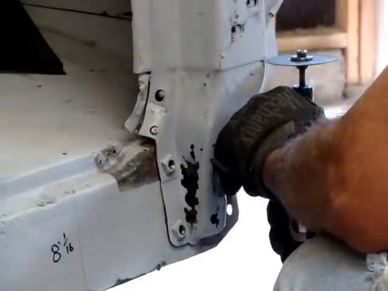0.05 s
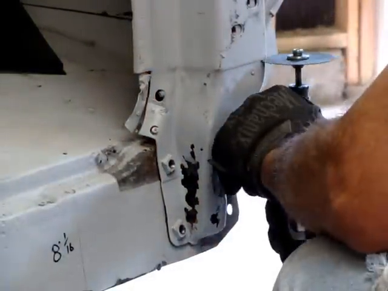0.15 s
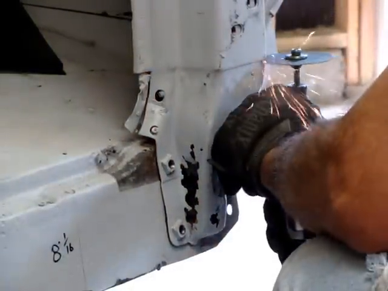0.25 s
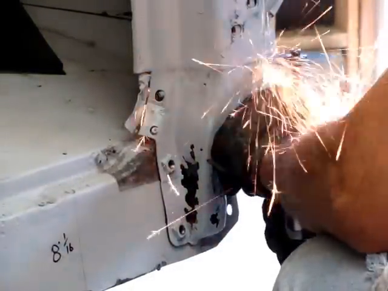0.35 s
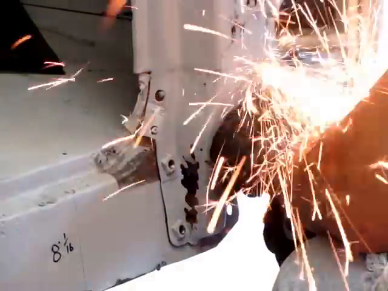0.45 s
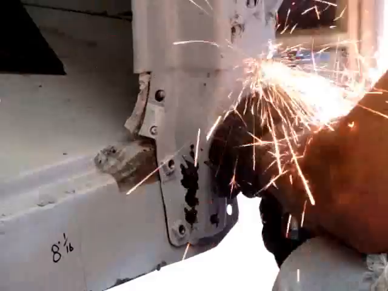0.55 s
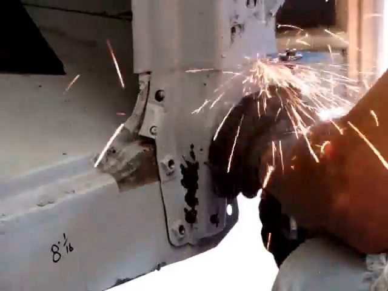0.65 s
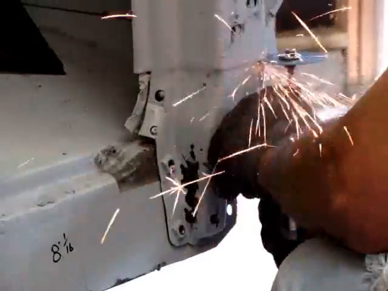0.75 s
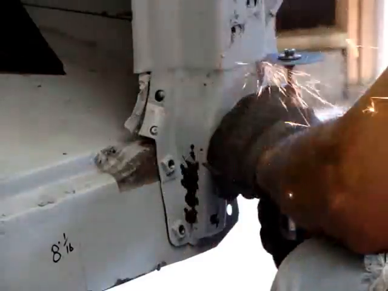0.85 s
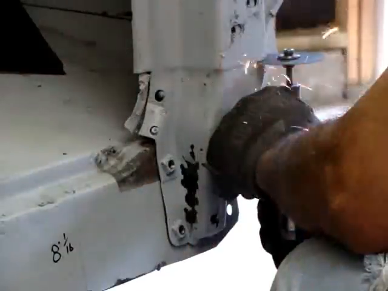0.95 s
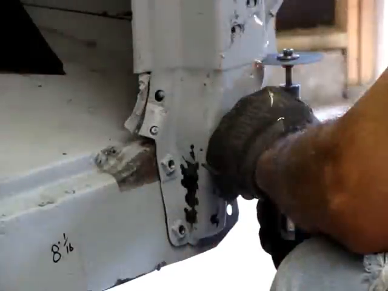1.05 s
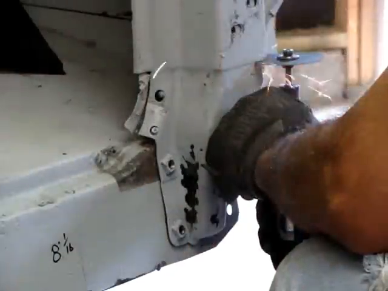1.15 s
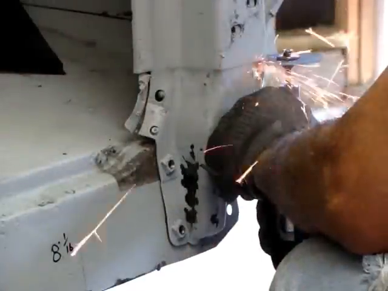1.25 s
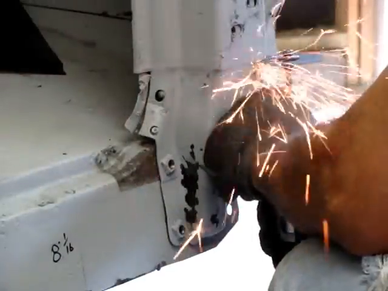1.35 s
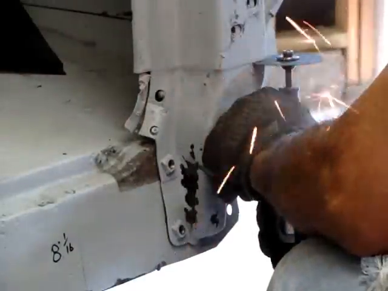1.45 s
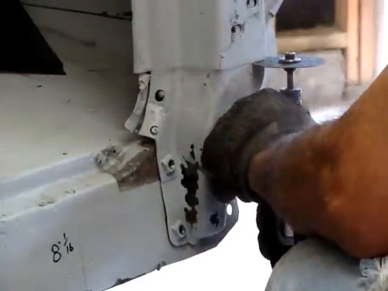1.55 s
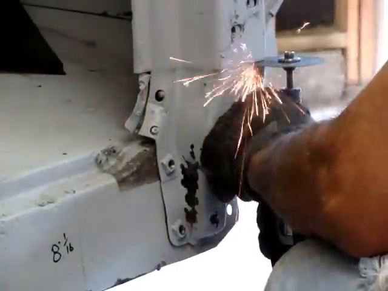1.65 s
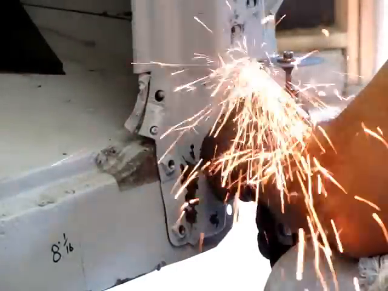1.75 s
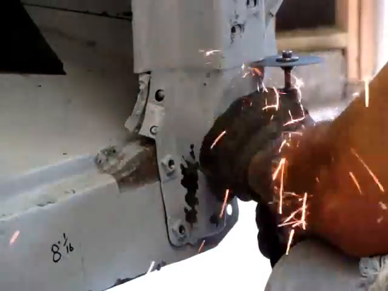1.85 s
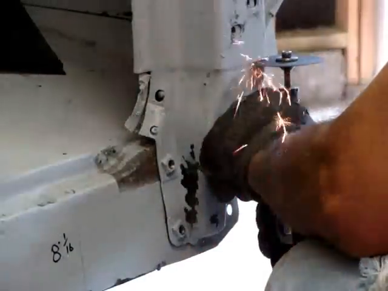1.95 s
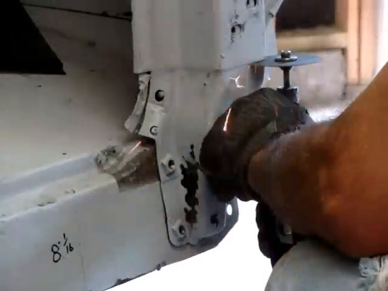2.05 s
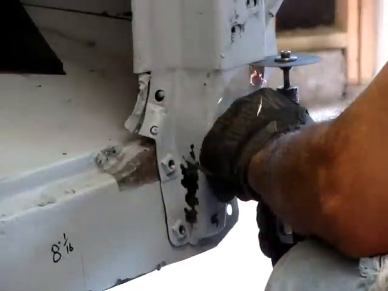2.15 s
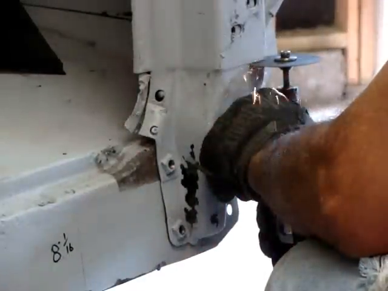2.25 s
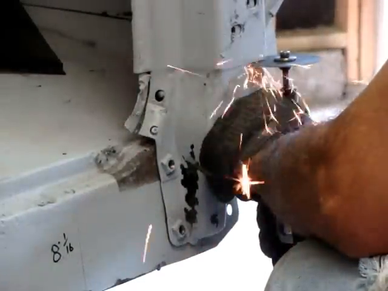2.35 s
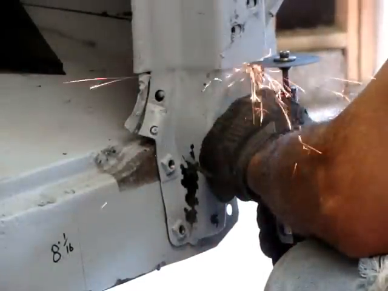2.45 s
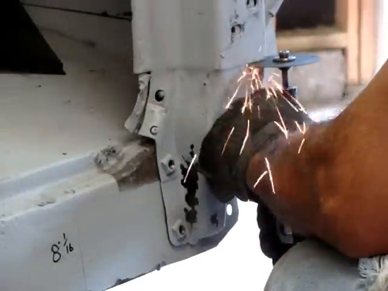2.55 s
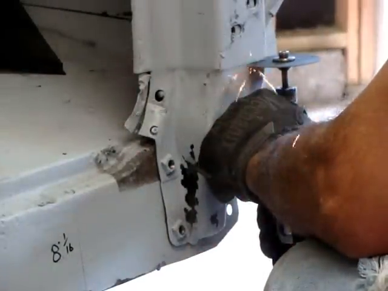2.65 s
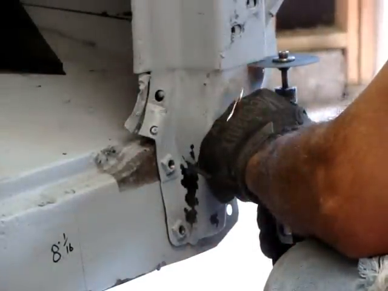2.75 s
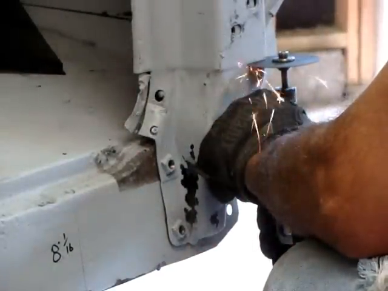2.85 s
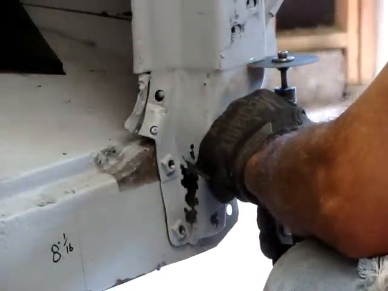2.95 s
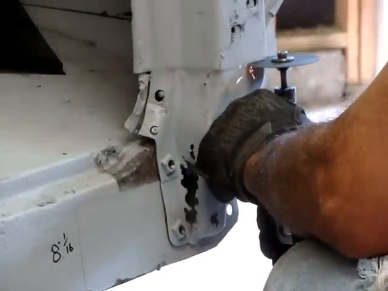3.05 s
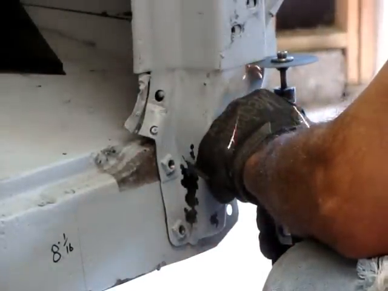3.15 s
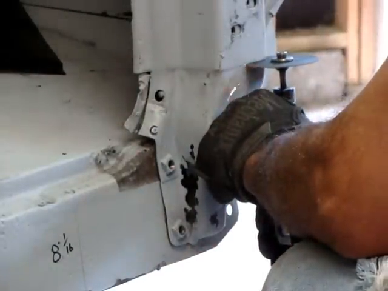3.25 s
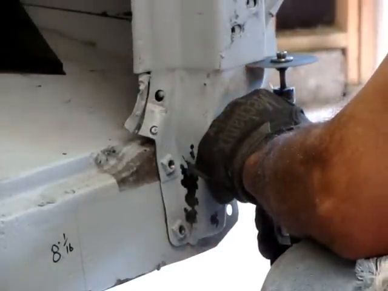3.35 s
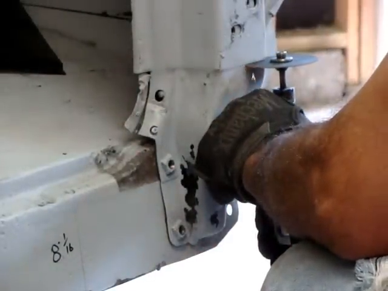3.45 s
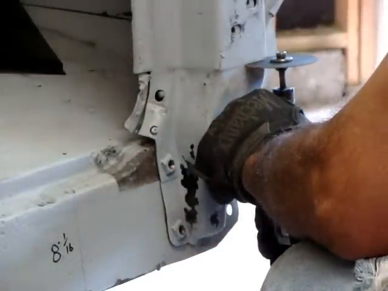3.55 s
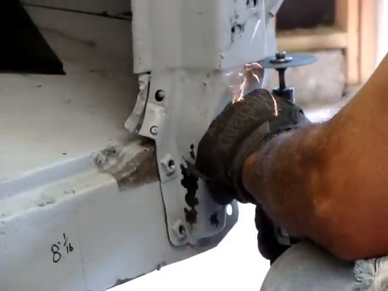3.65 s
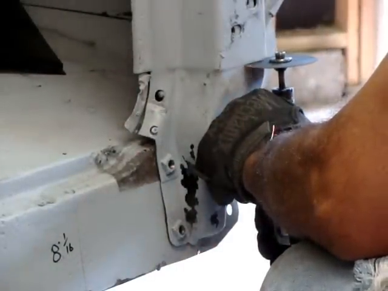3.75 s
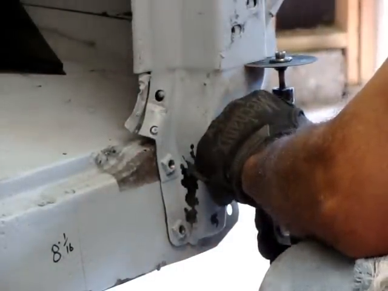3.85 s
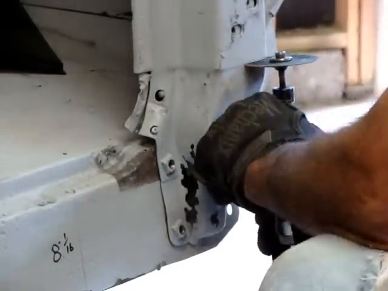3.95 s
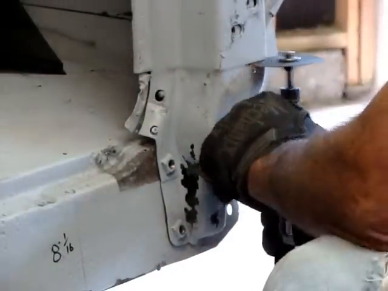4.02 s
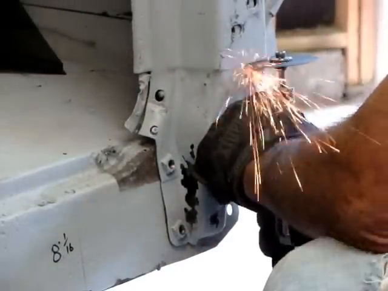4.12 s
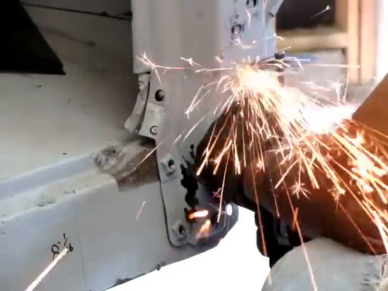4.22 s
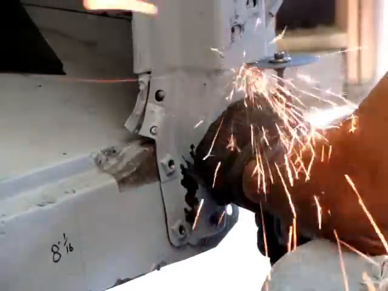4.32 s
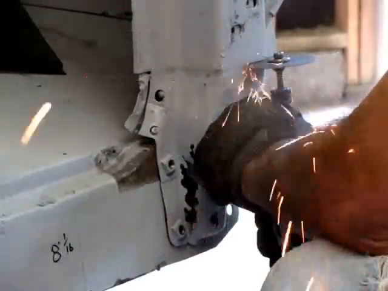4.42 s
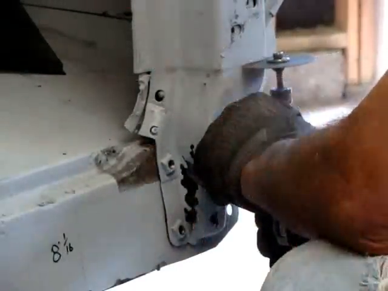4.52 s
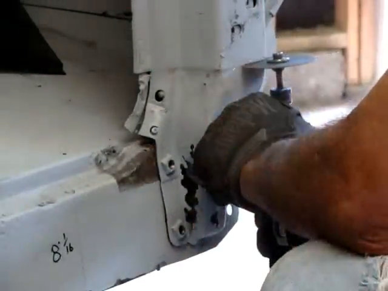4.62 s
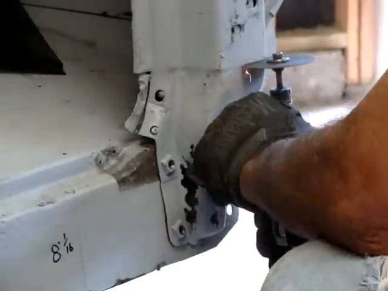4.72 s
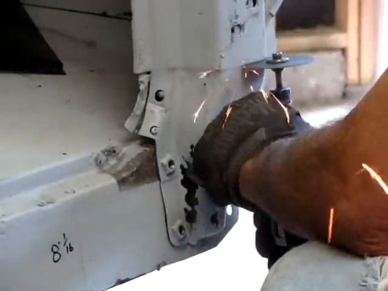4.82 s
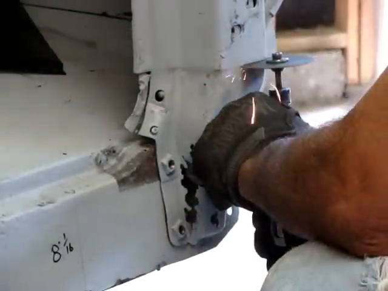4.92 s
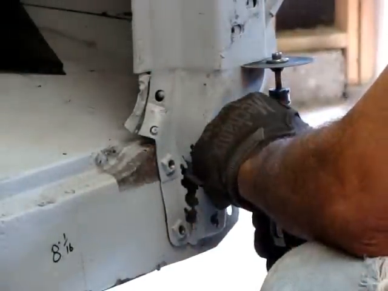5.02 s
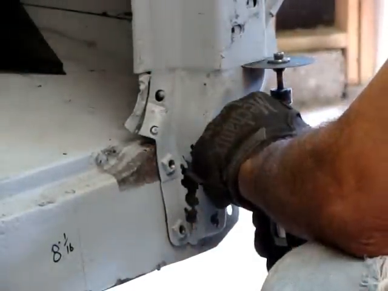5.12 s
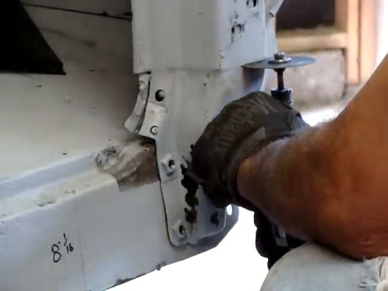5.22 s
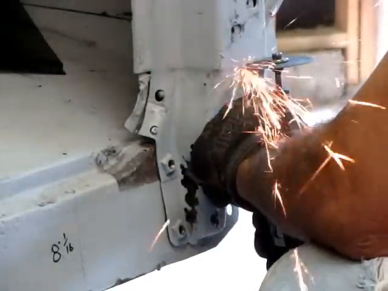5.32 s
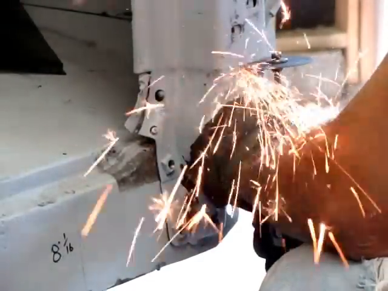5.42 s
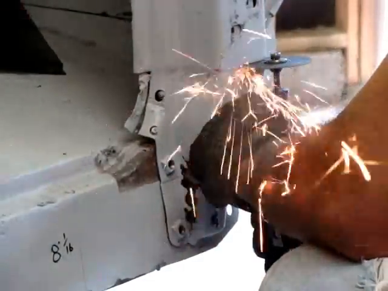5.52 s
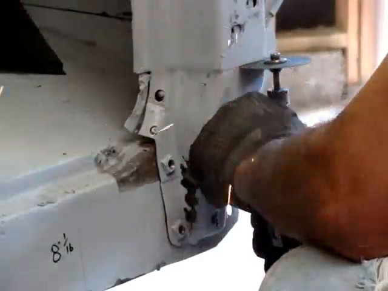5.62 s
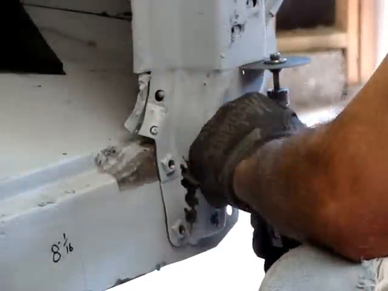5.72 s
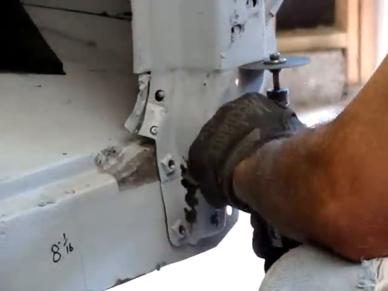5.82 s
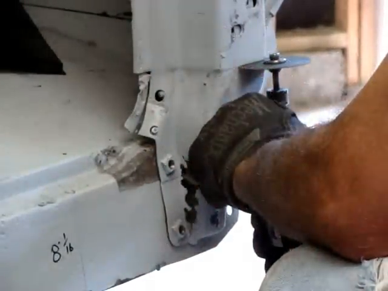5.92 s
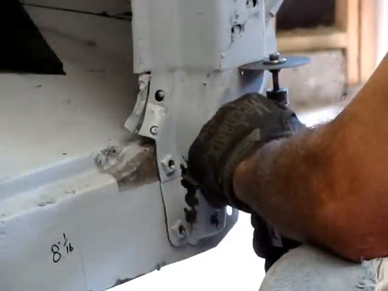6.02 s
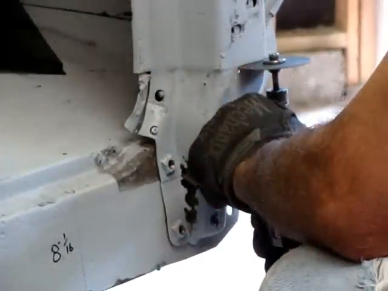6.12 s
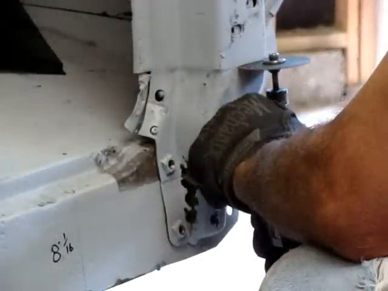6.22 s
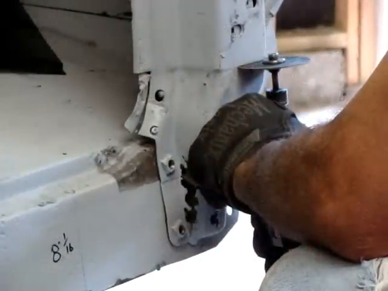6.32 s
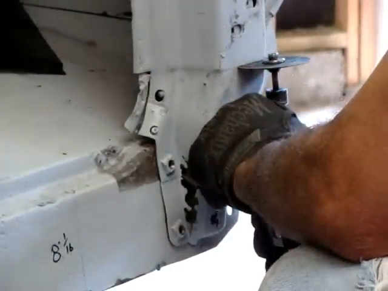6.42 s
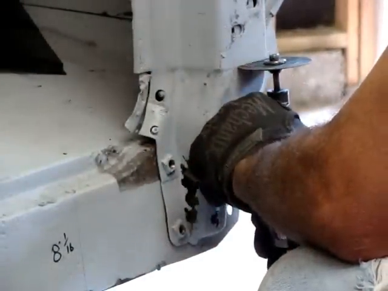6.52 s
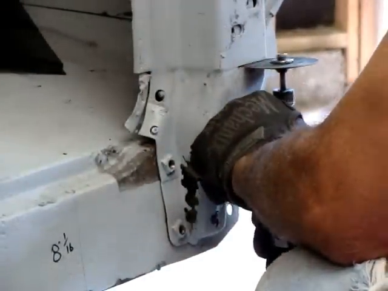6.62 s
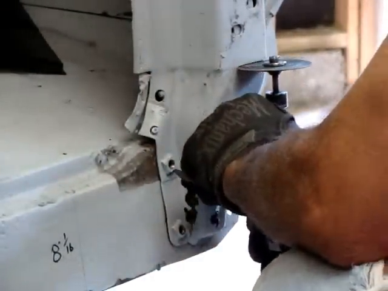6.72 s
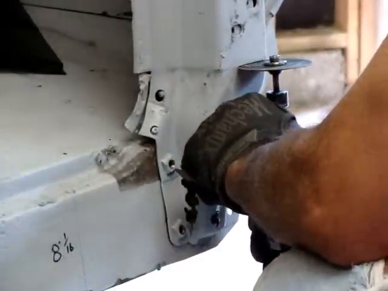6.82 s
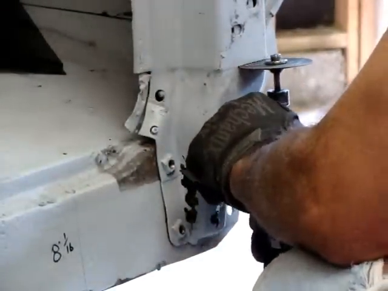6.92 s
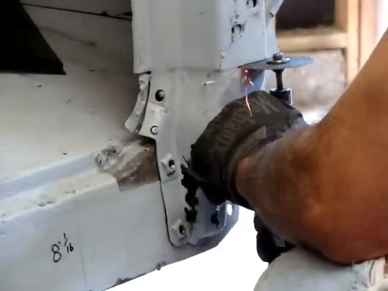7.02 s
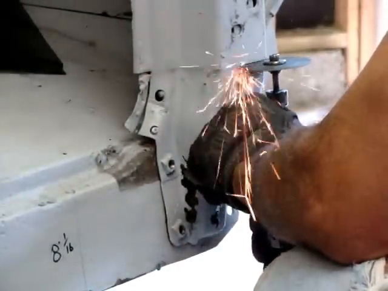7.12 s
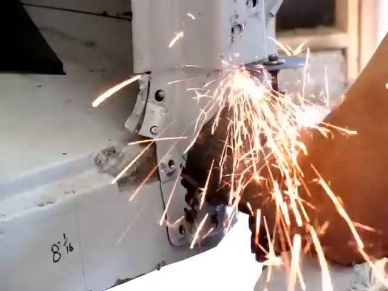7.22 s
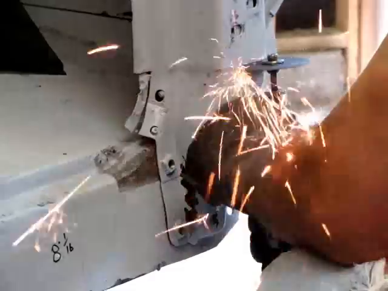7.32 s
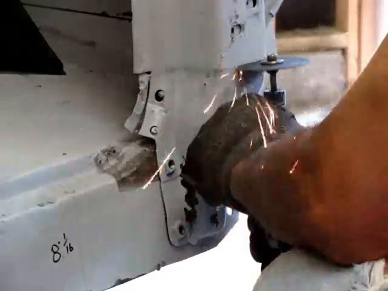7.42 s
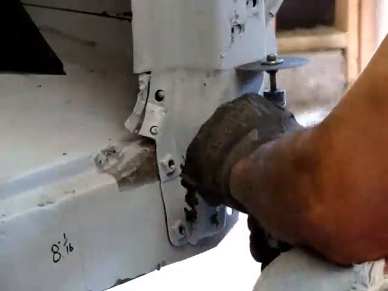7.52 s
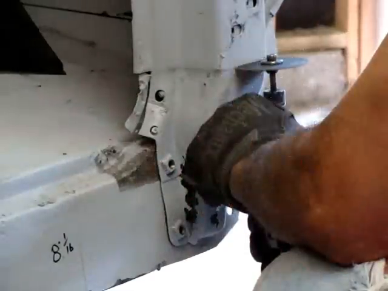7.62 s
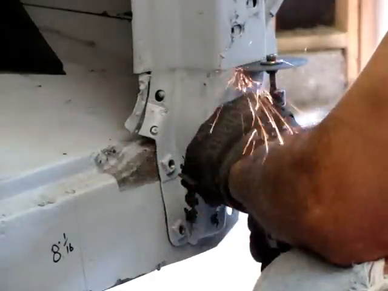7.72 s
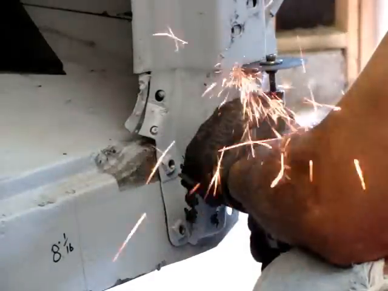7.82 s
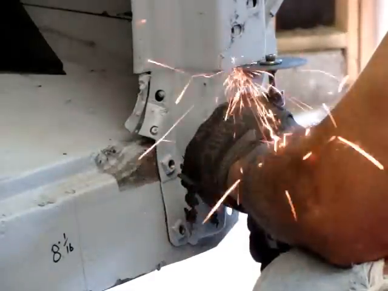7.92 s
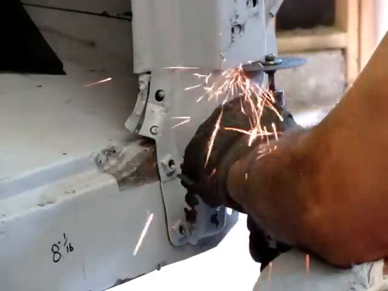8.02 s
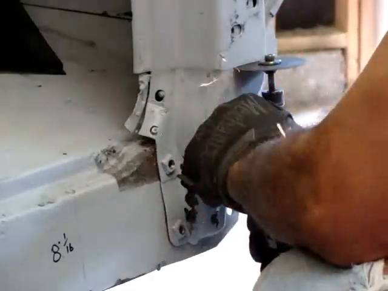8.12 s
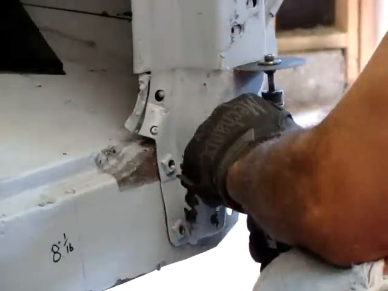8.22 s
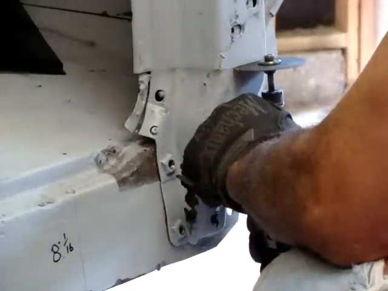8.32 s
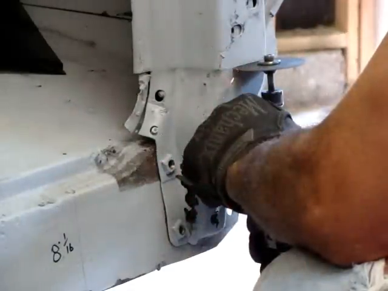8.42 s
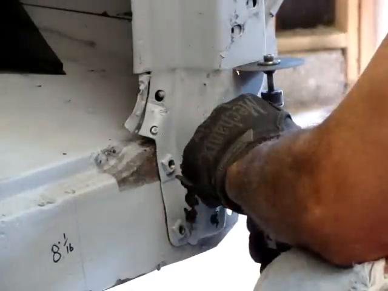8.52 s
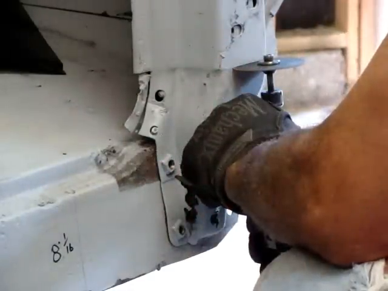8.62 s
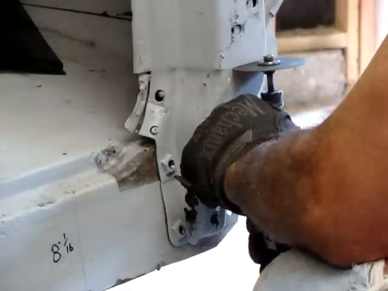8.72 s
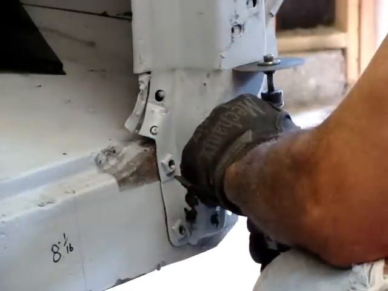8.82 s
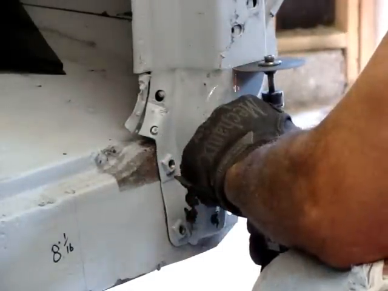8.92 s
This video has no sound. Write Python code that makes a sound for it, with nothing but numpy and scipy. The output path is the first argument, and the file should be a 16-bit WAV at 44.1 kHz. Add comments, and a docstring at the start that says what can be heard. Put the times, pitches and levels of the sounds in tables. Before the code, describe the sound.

Knocks, then a small pneumatic cutting wheel races and bogs down against sheet steel, harsh hiss and gritty scraping broken by brief stops.

```python
"""An air die grinder's vane motor whines as its small cut-off wheel works into a steel car panel in a garage.
Puffs of the vanes and the rub of an uneven rim make tones that rise as the wheel races and sink as it bites.
Chopped noise makes the exhaust hiss; grit noise and resonances make the rasp, the sparks and the knocks.
Spent air buffets the microphone. A compressor of sine lines and stroke noise drones, loudest in a long stall."""
import sys
import numpy as np
from scipy import signal
from scipy.fft import rfft, irfft, next_fast_len
from scipy.io import wavfile

SR = 44100
rng = np.random.default_rng(int(sys.argv[2]) if len(sys.argv) > 2 else 0)


def file_out(sig):
    """Save sig as 16-bit WAV at sys.argv[1]."""
    # one column per channel
    cols = np.atleast_2d(sig).T
    # limit, then scale
    lim = np.clip(cols, -1, 1)
    pcm = np.round(lim * 32767).astype(np.int16)
    wavfile.write(sys.argv[1], SR, pcm)


N = 395136
TIME = np.arange(N) / SR

# Pulls of the trigger; a light pull lets air through but does not turn the wheel:
# (open t/s, close t/s, relative air level/dB, relative cutting level/dB,
#  attack time constant/s, release time constant/s, pull: above 0.5 is full, below is light)
TRIGGER_PULLS = [(0.194, 0.306, -24, -26.5, 0.02, .02, 0), (0.31, 1.555, -18, -22.5, 0.025, 0.026, 1),
                 (1.699, 3.89, -18, -17, 0.018, 0.046, 1), (4.1, 5.07, -17, -18, 0.0076, 0.037, 1),
                 (5.13, 5.291, -33.5, -36.5, 0.056, 0.09, 0.01),
                 (5.225, 5.255, -23.5, -30, 0.0036, .012, 0), (5.335, 6.415, -17, -17, 0.011, 0.07, 1),
                 (6.48, 7.117, -20, -19.5, 0.54, 0.016, 0), (7.088, 9, -17.5, -18, 0.013, 0.046, 1)]
# The hand eases off and the wheel races, then bogs down again:
# (t of the top/s, added speed/turns per s, rise/s, fall/s, change of whine level/dB)
SPEED_SURGES = [(.408, 486, .254, .267, 1), (.825, 26, .05, .035, 1.5), (.931, 76, .184, .179, 2.5),
                (1.491, 192, .223, .134, .5), (1.82, 217, .096, .122, 1), (2.095, 73, .081, .062, 2),
                (2.306, 37, .066, .068, 0), (2.529, 99, .142, .221, 4), (2.983, 54, .089, .07, 2),
                (3.245, 56, .088, .075, 0), (3.5, 9, .25, .25, -1.5), (3.755, 48, .055, .085, -2),
                (4.221, 420, .195, .16, -1), (4.457, 81, .062, .124, 1), (4.703, 25, .041, .041, -2),
                (4.881, 61, .051, .208, 0), (5.374, 331, .105, .2, 0), (5.627, 48, .062, .08, 0),
                (5.883, 35, .05, .056, -1.5), (6.239, 21, .123, .086, -1.5), (7.161, 338, .212, .243, -1),
                (7.91, 161, .13, .26, .5), (8.49, 24, .16, .05, -3), (8.83, 25, .04, .06, 0)]
IDLE_SPEED, LOADED_SPEED = 25.0, 82.0  # turns per s: creeping, and deep in the cut
SPIN_UP_S, COAST_S = .04, .07  # time constants


def rotor_speed():
    """First-order spin-up: air drives the rotor toward its loaded speed, surges add to it (turns per s)."""
    driven = sum(gate(start, stop, SPIN_UP_S, COAST_S)
                 for start, stop, *_, pull in TRIGGER_PULLS if pull > .5)
    racing = sum(added * swell(s, rise, fall) for s, added, rise, fall, _ in SPEED_SURGES)
    return IDLE_SPEED + driven * (LOADED_SPEED - IDLE_SPEED + racing)


def howl():
    """Level envelope: each surge of speed has its own whine level, some howl louder than others (dB)."""
    return sum(db * swell(s, rise, fall) for s, _, rise, fall, db in SPEED_SURGES)


# The wheel digs in harder, above all as it jerks into motion:
# (t/s, added cutting level/dB, half length/s)
WHEEL_BITES = [(0.35, 13, 0.035), (0.523, 14, 0.18), (1.373, 8, 0.15), (1.78, 4, 0.022), (3.18, 0, 0.03),
               (4.15, 9.5, 0.023), (4.437, 2, 0.027), (4.885, 1.5, 0.074), (5.385, 12, 0.024),
               (7.15, 9.5, 0.034), (7.748, 2, 0.19)]
SPURT_DB, SPURT_S = 2.5, .02  # pent-up air escapes as the valve opens
RUB_ON_S = 0.03  # the wheel rubs on after the air is shut off


def effort():
    """Valve flow as the common drive: exhaust and cutting levels (dB) follow it, bites add to the cutting."""
    air = cut = 1e-5
    for start, stop, air_db, cut_db, attack, release, _ in TRIGGER_PULLS:
        spurt_db = SPURT_DB * np.exp(-since(start) / SPURT_S)
        air = air + from_db(air_db + spurt_db) * gate(start, stop, attack, release)
        cut = cut + from_db(cut_db) * gate(start, stop + RUB_ON_S, attack, release)
    bites_db = sum(db * swell(s, length, length) for s, db, length in WHEEL_BITES)
    return 20 * np.log10(air), 20 * np.log10(cut) + bites_db


VANES = 4
# Harmonics of the vane rate: (multiple, relative level/dB)
VANE_HARMONICS = [(1, 0), (2, 0), (3, 3), (4, 1), (5, -1), (6, -1), (7, -1), (8, -2), (9, -3), (10, -3),
                  (11, -4), (12, -4)]
# Response of the exhaust port to one vane line: (f/Hz, gain/dB)
PORT_RESPONSE = [(300, -56), (800, -45), (930, -34), (1085, -24), (1200, -33), (1450, -28.5), (1780, -26.5),
                 (2350, -30), (2850, -26), (3400, -35), (4300, -44), (5700, -38), (8000, -46), (15000, -52)]
# Response to one line of the uneven rim: (f/Hz, gain/dB)
RIM_RESPONSE = [(200, -62), (550, -49), (1000, -42), (2000, -41), (3800, -43), (5200, -36), (6800, -38),
                (10000, -43), (15000, -47)]


def whine(speed, level_db, stall_speed=86.0, motor_db=17.7, wheel_db=15.0, waver_db=2.4, panel_db=0.0,
          rim_lines=50):
    """Periodic excitation: a puff per vane and a rim rub per turn, both growing with speed."""
    turns = np.cumsum(speed + .5 * drift(45)) / SR
    octaves = np.log2(speed / 190)
    spinning = 1 / (1 + (stall_speed / speed) ** 4)
    vane_wave = cyclic(VANES * turns, [db for _, db in VANE_HARMONICS])
    puffs = colour(vane_wave, PORT_RESPONSE)
    rub = colour(cyclic(turns, rng.normal(0, 3.5, rim_lines)), RIM_RESPONSE)
    motor = puffs * from_db(motor_db + 1.2 * octaves + waver_db * drift(26))
    wheel = rub * from_db(wheel_db + 1.5 * octaves + drift(30))
    # at high speed puffs and rim make the thin wheel sing around its own resonances
    singing = resonate(motor, 5900, 1600) * np.clip((speed - 320) / 50, 0, 2.6)
    singing = singing + resonate(wheel, 5400, 500) * np.clip((speed - 460) / 25, 0, 3.4)
    # bogged down in the cut, the tool shakes the panel's lowest resonance
    bogged = 1 / (1 + (speed / 140) ** 4)
    humming = resonate(motor, 1085, 70) * from_db(panel_db + 3 * drift(10)) * bogged
    tones = (motor + wheel + singing + humming) * spinning * from_db(level_db)
    return garage(tones, near_db=-7, near_t60=.04, far_db=-7, far_t60=.26)


# Colour of the exhaust noise: (f/Hz, relative level per Hz/dB)
HISS_COLOUR = [(300, -22.5), (1000, -23), (2500, -10.5), (4200, -7.5), (5200, -6), (6300, -0.5),
               (7500, -3.5), (8800, -4.5), (10400, -3), (11500, -6), (15500, -10)]


def exhaust(speed, hiss_db, free_db=-3.5, chop=0.3, flutter_db=0.64, swirl=0.3, swirl_bands=9):
    """Amplitude modulation: vanes chop the swirling jet; reflections off steel add a metallic ripple."""
    chopping = 1 + chop * np.cos(2 * np.pi * VANES * np.cumsum(speed) / SR)
    jet = garage(noise(HISS_COLOUR), near_db=-11, near_t60=.03, far_db=-9, far_t60=.12)
    bands = np.geomspace(3500, 12000, swirl_bands)
    jet = jet + swirl * sum(resonate(jet, hz, hz / 10) * drift(9) for hz in bands)
    return jet * chopping * from_db(hiss_db + free_db * (speed / 450) ** 2 + flutter_db * drift(70))


# Colour of grit on steel: (f/Hz, relative level per Hz/dB)
RASP_COLOUR = [(150, -26.5), (350, -10.5), (600, -11.5), (850, 0), (1080, -4.5), (1250, -1), (1650, -0.5),
               (2600, 0), (3500, -2.5), (5000, -2), (9000, -7)]
# Panel resonances: (f/Hz, width/Hz, relative level/dB)
PANEL_MODES = [(1080, 7, 8.5), (1370, 31, -25), (1619, 18, 7), (1720, 17, 6), (1881, 20, 9.5),
               (2038, 30, 6.5), (2247, 23, 8.5), (2570, 22, 2.5), (2630, 19, 1), (3220, 38, 5),
               (3587, 40, 4), (3934, 18, 9.5), (4980, 57, 6), (5250, 66, 7), (5690, 69, 7.5),
               (6650, 62, -14), (6770, 19, 6.5)]


def rasp(speed, cut_db, grit_db=0.0, ring_db=-2.0, free_db=-9.0, grain_db=1.5):
    """Random excitation of modes: grit tears at the sheet and rings it, less so as the wheel runs free."""
    grit = noise(RASP_COLOUR) * from_db(grain_db * drift(230))
    scrape = rng.standard_normal(N)
    ring = rms_one(sum(from_db(db) * resonate(scrape, hz, width) for hz, width, db in PANEL_MODES))
    freedom = np.log2(1 + (speed / 260) ** 2)
    contact = from_db(grit_db) * grit + from_db(ring_db) * ring
    return from_db(cut_db + free_db * freedom) * contact


def sparks(hiss_db, per_s=400.0, spark_db=-12.0, spread_db=4.0):
    """Impulse response: flying grit ticks against the steel, each grain in one of ten resonances."""
    struck = rng.random(N) < per_s / SR
    sizes = from_db(spread_db * np.minimum(rng.exponential(1, N), 4)) * struck
    pitches = np.geomspace(4500, 13000, 10)
    dealt = rng.integers(0, len(pitches), N)
    ticks = sum(resonate(sizes * (dealt == k) + 1e-18, hz, 500) for k, hz in enumerate(pitches))
    return rms_one(ticks) * from_db(hiss_db + spark_db)


# Knocks: the wheel touches the panel, or the air valve snaps open:
# (t/s, relative level/dB, low-pass corner f/Hz)
KNOCK_EVENTS = [(.008, -23.5, 6000), (.113, -22.5, 1500), (0.129, -29.5, 8800), (.222, -33, 9000),
                (1.703, -42, 7000), (5.232, -31, 12000)]
# Ring after a knock: (f/Hz, relative level/dB, t60/s)
KNOCK_RING = [(518, -7, 0.49), (810, -4.5, 0.31), (835, -7.5, 0.91), (1550, -4.5, 0.45), (2660, 0, 0.27),
              (2860, -19, .25), (4780, -4.5, 0.24), (5470, -9, 0.2), (7200, -4, 0.16)]


def knocks(clatter_t60=0.23, clatter_db=0.0, ring_db=-3.0, ring_width_hz=145.0):
    """Modal decay: a touch of the wheel or a snap of the valve clatters and rings roughly, dying away."""
    out, t = np.zeros(N), TIME[:SR // 2]
    clatter = noise(RASP_COLOUR)
    for s, db, corner_hz in KNOCK_EVENTS:
        start = round(s * SR)
        span = slice(start, start + len(t))
        chatter = rng.standard_normal(len(t))
        ring = sum(from_db(level - 60 * t / t60) * rms_one(resonate(chatter, hz, ring_width_hz))
                   for hz, level, t60 in KNOCK_RING)
        hit = from_db(ring_db) * ring + clatter[span] * from_db(clatter_db - 60 * t / clatter_t60)
        dull = np.exp(-2 * np.pi * corner_hz / SR)
        out[span] += from_db(db) * signal.lfilter([1 - dull], [1, -dull], hit)
    return out


# Exhaust gusts on the microphone: (t/s, level/dB, half length/s)
AIR_GUSTS = [(0.226, -33, 0.007), (0.323, -30, 0.014), (7.098, -37, 0.022)]
# Colour of moving air: (f/Hz, relative level per Hz/dB)
BUFFET_COLOUR = [(15, 3.5), (35, -3), (70, -3.5), (150, -4), (300, -8), (600, -3.5), (1500, -24.5)]


def buffet(hiss_db, draught_db=-22.0):
    """Turbulent pressure: spent air blows over the microphone, with brief gusts."""
    gusts = sum(from_db(db) * np.exp(-((TIME - s) / length) ** 2) for s, db, length in AIR_GUSTS)
    draught = from_db(hiss_db + draught_db + 1.7 * drift(11))
    return noise(BUFFET_COLOUR) * (draught + gusts)


# Compressor drone over time: (t/s, level change/dB)
DRONE_LEVEL = [(0, -23), (1.7, -23.5), (4.05, -15.5), (5.2, -19.5), (6.5, -11.5), (6.62, -8), (6.78, -1),
               (7.07, 3.5), (7.19, -41), (8.96, -9)]
# Compressor lines: (f/Hz, relative rms level/dB)
COMPRESSOR_LINES = [(393.0, -42), (441.4, -40), (635.2, -36.5), (683.7, -34), (732.1, -39), (882.9, -38),
                    (1055, -33.5), (1077, -28.5), (1125, -47), (1174, -59), (1249, -41), (1292, -42),
                    (1421, -54), (1470, -54), (4610, -34.5)]
# Colour of chuff and rattle: (f/Hz, relative level/dB)
CHUFF_COLOUR = [(100, -37), (280, -18.5), (400, -3.5), (560, -9.5), (700, -6.5), (1050, 1), (1500, -8),
                (2500, -12), (6000, -12.5)]
STROKE_HZ, THROB_DB = 49.0, 2.2


def compressor(chuff_db=-23.5, rattle_db=-27.0, waver_db=-0.5, rattle_lines=100):
    """Line spectrum and modulated noise: pump and tank tones, with a rattle and chuff of air per stroke."""
    lines = 0
    for hz, db in COMPRESSOR_LINES:
        tone = np.sin(2 * np.pi * (hz * TIME + rng.random()))
        lines = lines + np.sqrt(2) * from_db(db + waver_db * drift(3.4)) * tone
    stroke = 2 * np.pi * STROKE_HZ * TIME
    rattle_wave = cyclic(STROKE_HZ * TIME, rng.normal(0, 1.3, rattle_lines))
    rattle = rms_one(colour(rattle_wave, CHUFF_COLOUR))
    throb = from_db(THROB_DB * (np.cos(stroke) + .7 * np.cos(2 * stroke)))
    strokes = (from_db(chuff_db) * noise(CHUFF_COLOUR) + from_db(rattle_db) * rattle) * throb
    drone_db = np.interp(TIME, *np.transpose(DRONE_LEVEL))
    return (lines * np.sqrt(throb) + strokes) * from_db(drone_db)


def room_rumble():
    """Stationary background noise: a faint low rumble."""
    return from_db(-57.0) * noise(BUFFET_COLOUR)


def garage(x, near_db, near_t60, far_db, far_t60):
    """Reverberation: direct sound, quick reflections inside the car body, then the tail of the room."""
    t = TIME[:SR // 2]
    response = (t == 0) * 1.0
    for db, t60 in ((near_db, near_t60), (far_db, far_t60)):
        echoes = rng.standard_normal(len(t)) * from_db(-60 * t / t60) * (t > .001)
        response = response + from_db(db) * echoes / np.linalg.norm(echoes)
    return signal.fftconvolve(x, response / np.linalg.norm(response))[:N]


def cyclic(turns, line_db, size=2048):
    """Fourier synthesis: a wave repeating every turn, its harmonics at the given rms levels."""
    lines = from_db(line_db) * np.exp(2j * np.pi * rng.random(len(line_db)))
    shape = irfft(np.append(0, lines), size) * size / np.sqrt(2)
    return np.interp(turns % 1 * size, np.arange(size + 1), np.append(shape, shape[0]))


def resonate(x, hz, width):
    """Simple resonance: a two-pole filter of the given width (Hz) with gain 1 on top."""
    r = np.exp(-np.pi * width / SR)
    zeros = np.array([1, 0, -1]) * (1 - r * r) / 2
    return signal.lfilter(zeros, [1, -2 * r * np.cos(2 * np.pi * hz / SR), r * r], x)


def colour(x, points):
    """Linear filtering: shape a sound by an (f/Hz, gain/dB) response, interpolated over log frequency."""
    size = next_fast_len(N + 8192)
    hz, db = np.transpose(points)
    bins = np.maximum(np.arange(size // 2 + 1) * SR / size, 1)
    gain = from_db(np.interp(np.log(bins), np.log(hz), db))
    return irfft(rfft(x, size) * gain, size)[:N]


def noise(points):
    """Spectral shaping: coloured noise of unit rms."""
    return rms_one(colour(rng.standard_normal(N), points))


def drift(rate):
    """Low-passed chance: a smooth signal of unit spread, changing about `rate` times a second."""
    r = np.exp(-40 * np.pi * rate / SR)  # runs at a twentieth of the sample rate
    chance = rng.standard_normal(N // 20 + 2002)
    slow = signal.lfilter([1], [1, -2 * r, r * r], chance)[2000:]  # drop the settling
    return np.interp(np.arange(N) / 20, np.arange(len(slow)), rms_one(slow))


def gate(start, stop, attack, release):
    """Exponential relaxation: rises toward one from the start and dies away after the stop."""
    return (1 - np.exp(-since(start) / attack)) * np.exp(-since(stop) / release)


def swell(s, rise, fall):
    """Gaussian envelope: a smooth hump of height one at a moment."""
    return np.exp(-((TIME - s) / np.where(TIME < s, rise, fall)) ** 2)


def since(s):
    """Causal time: seconds gone by since a moment, zero before it."""
    return np.maximum(TIME - s, 0)


def from_db(db):
    """Logarithmic level: decibels to gain."""
    return 10 ** (np.asarray(db) / 20)


def rms_one(x):
    """Effective value: scale to unit rms."""
    return x / np.sqrt(np.mean(x ** 2) + 1e-20)


def scene():
    """Superposition: tool, panel and compressor over faint room rumble, the same in both channels."""
    speed = rotor_speed()
    hiss_db, cut_db = effort()
    tool = whine(speed, hiss_db + howl()) + exhaust(speed, hiss_db)
    grinding = rasp(speed, cut_db) + sparks(hiss_db) + knocks()
    background = buffet(hiss_db) + compressor() + room_rumble()
    mono = tool + grinding + background
    return np.array([mono, mono])


def record(dry):
    """Clipping and band limiting: peaks are clipped at 0.85, then a steep low-pass cuts the top."""
    low_pass = signal.ellip(12, .1, 80, 15800, fs=SR, output="sos")  # corner in Hz
    return signal.sosfilt(low_pass, np.clip(dry, -.85, .85))


dry = scene()
out = record(dry)
file_out(out)
```